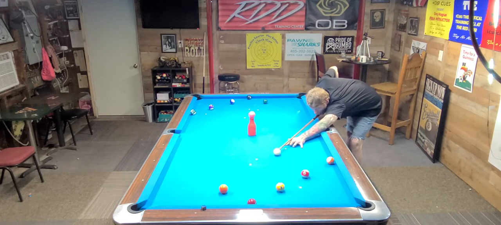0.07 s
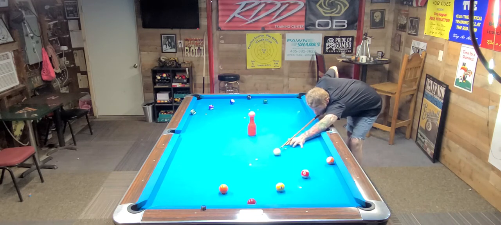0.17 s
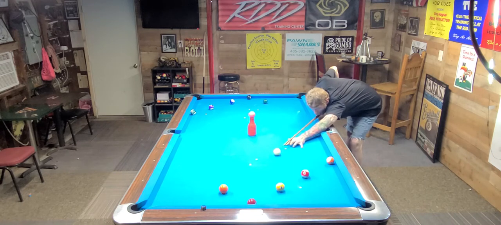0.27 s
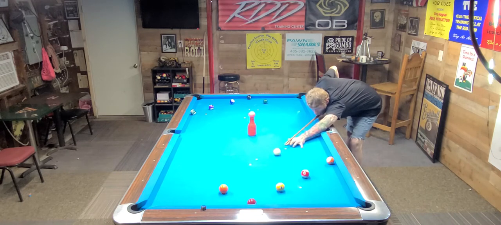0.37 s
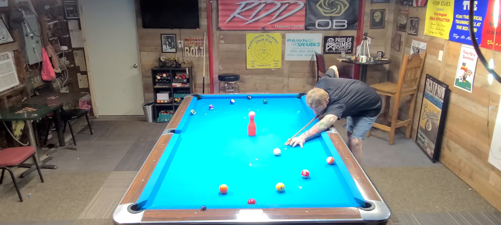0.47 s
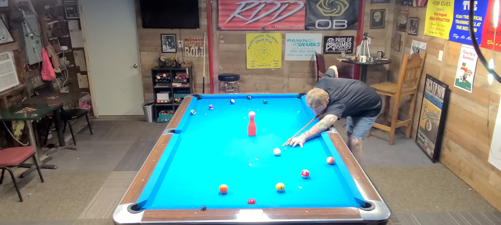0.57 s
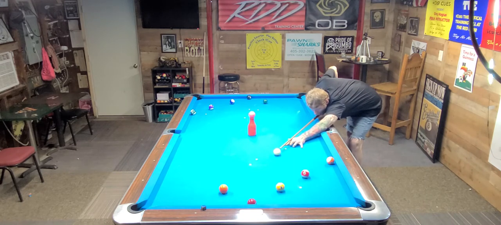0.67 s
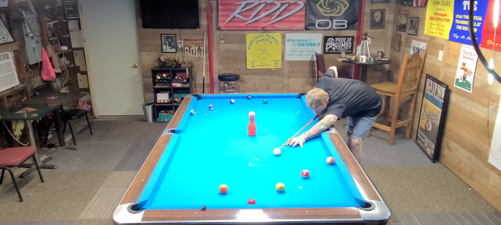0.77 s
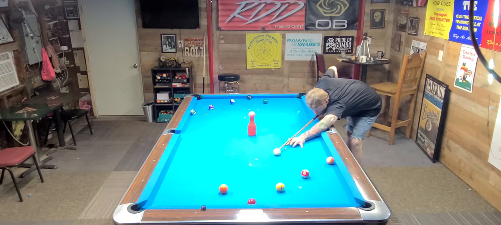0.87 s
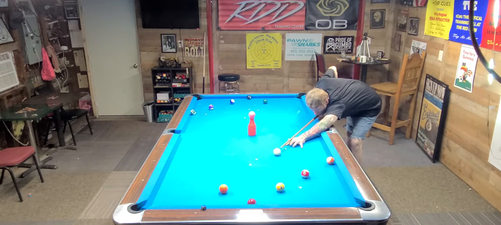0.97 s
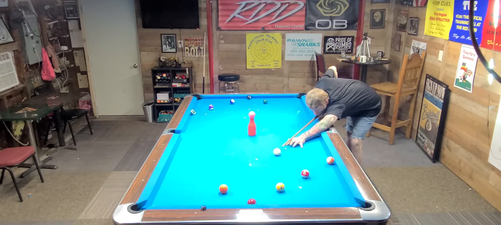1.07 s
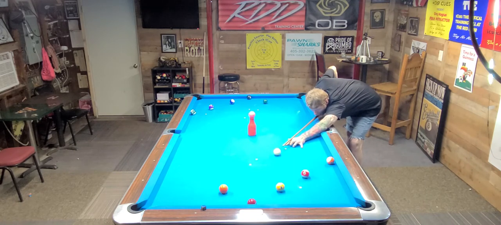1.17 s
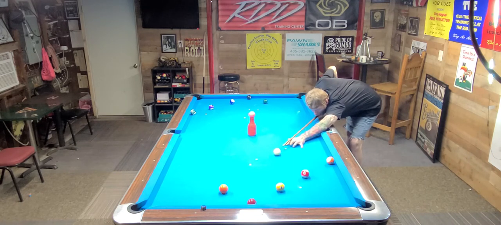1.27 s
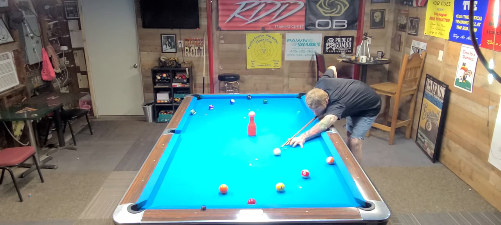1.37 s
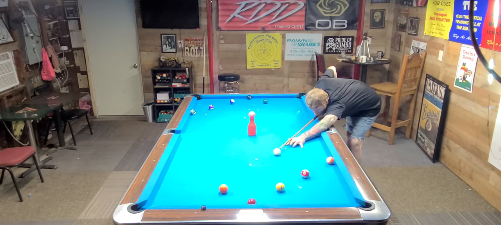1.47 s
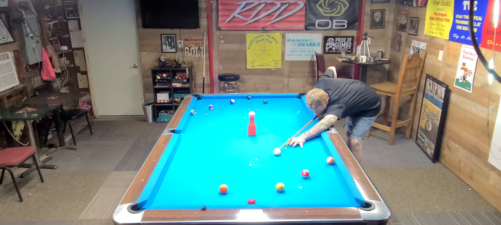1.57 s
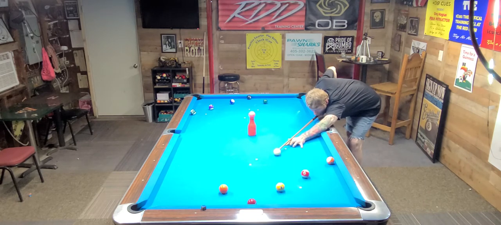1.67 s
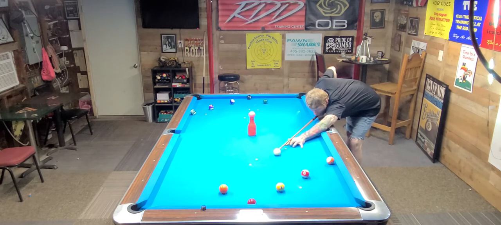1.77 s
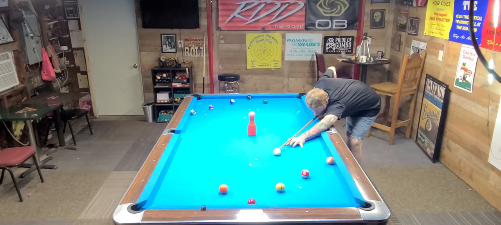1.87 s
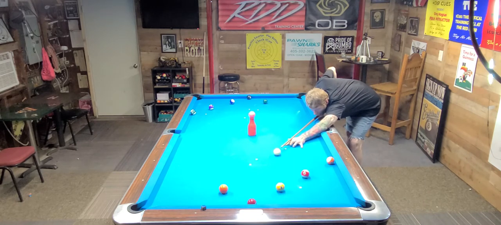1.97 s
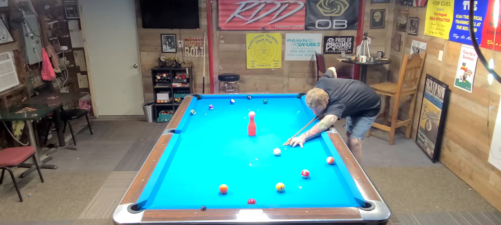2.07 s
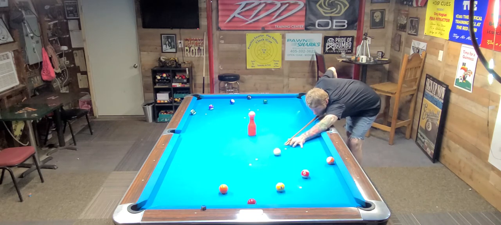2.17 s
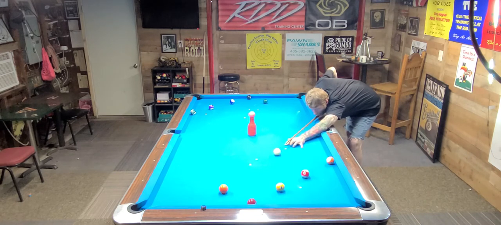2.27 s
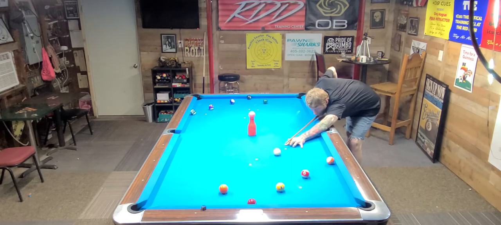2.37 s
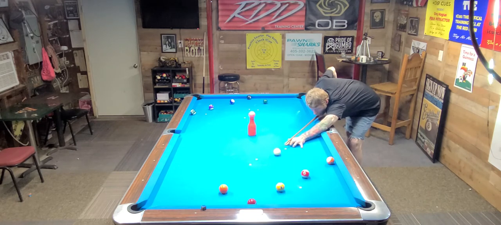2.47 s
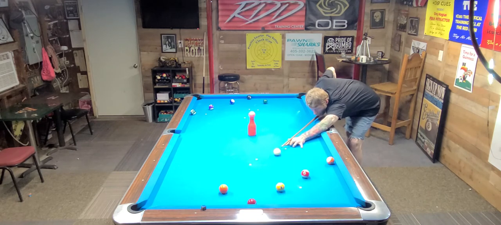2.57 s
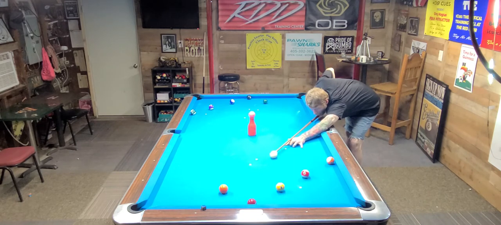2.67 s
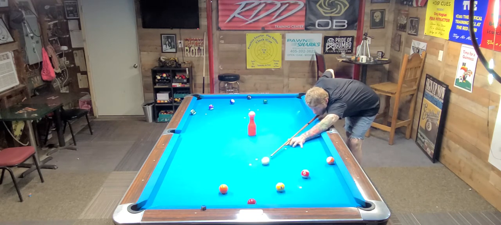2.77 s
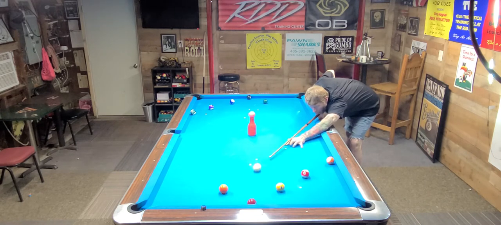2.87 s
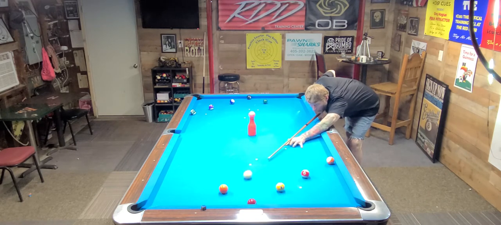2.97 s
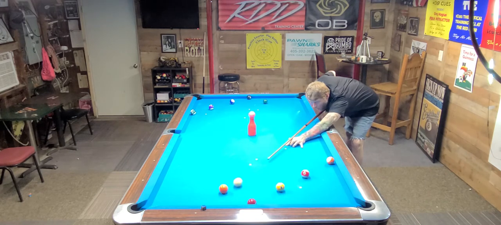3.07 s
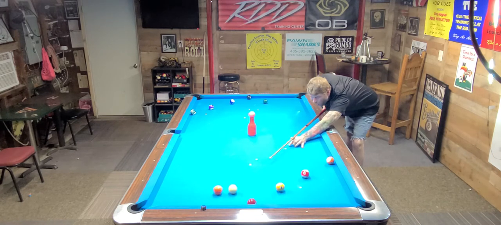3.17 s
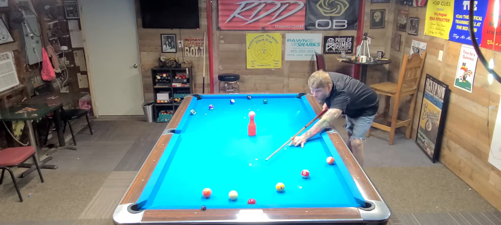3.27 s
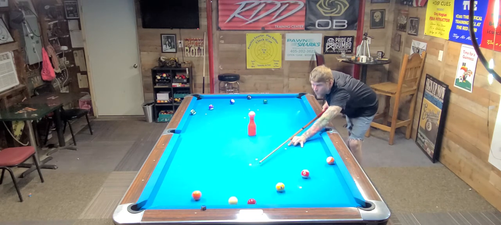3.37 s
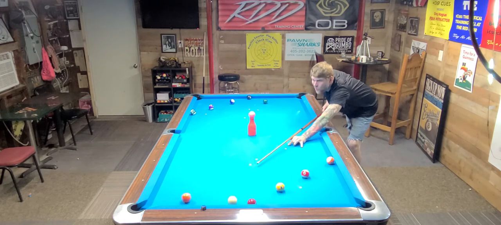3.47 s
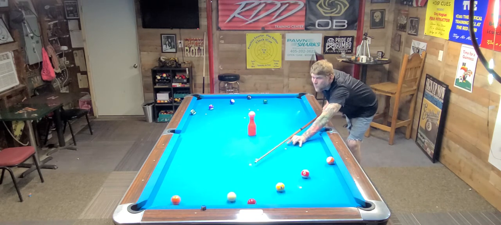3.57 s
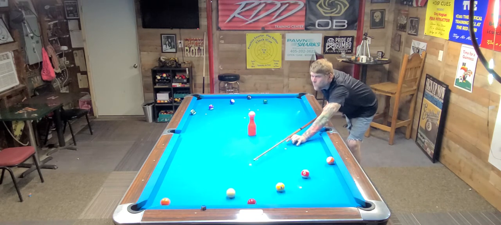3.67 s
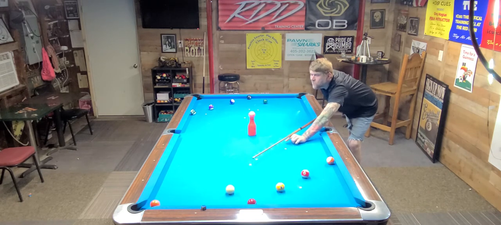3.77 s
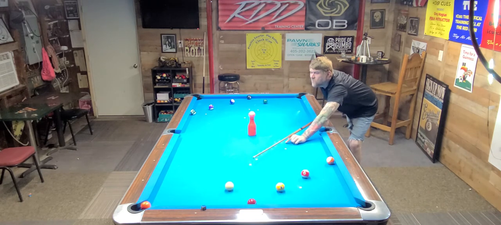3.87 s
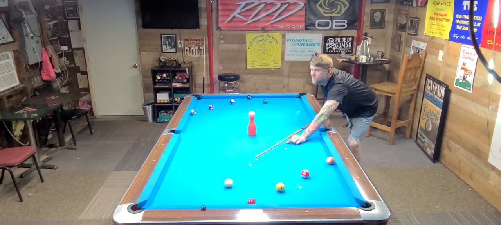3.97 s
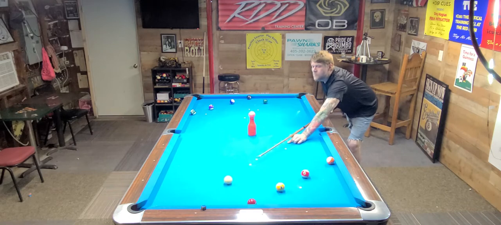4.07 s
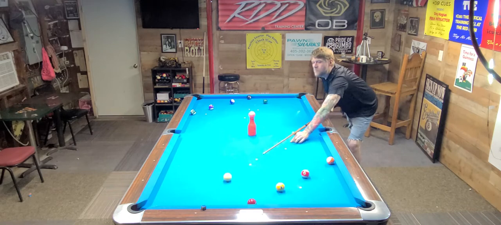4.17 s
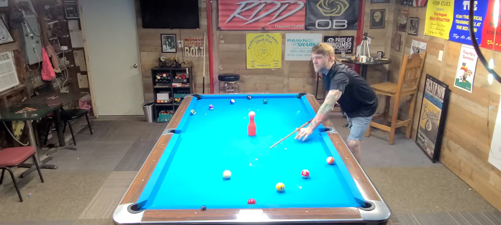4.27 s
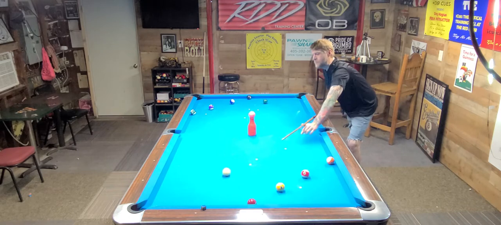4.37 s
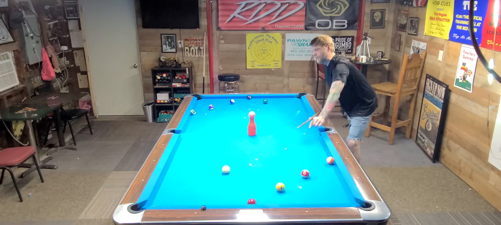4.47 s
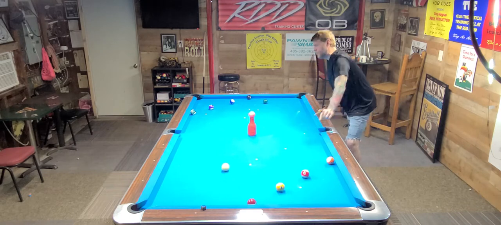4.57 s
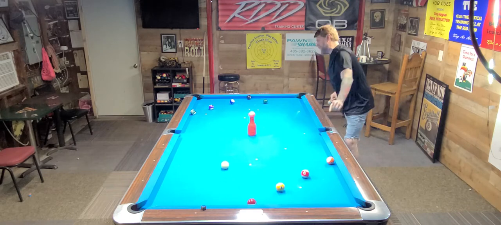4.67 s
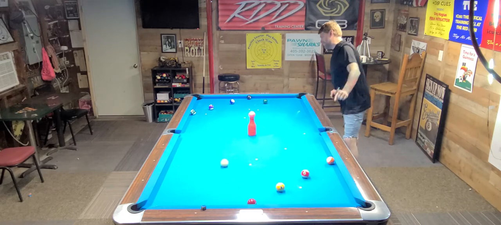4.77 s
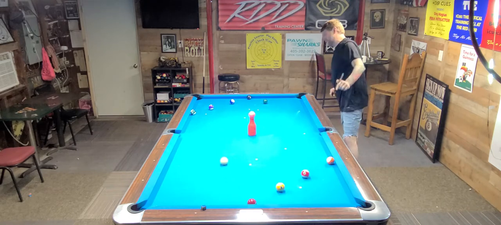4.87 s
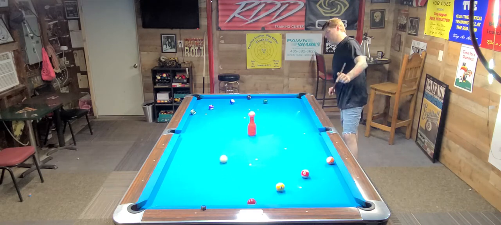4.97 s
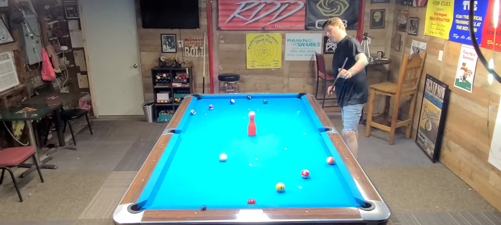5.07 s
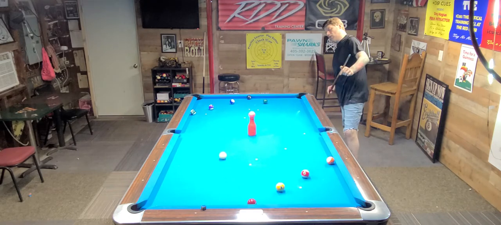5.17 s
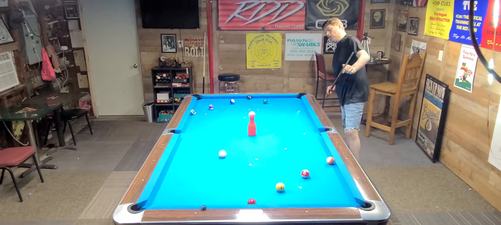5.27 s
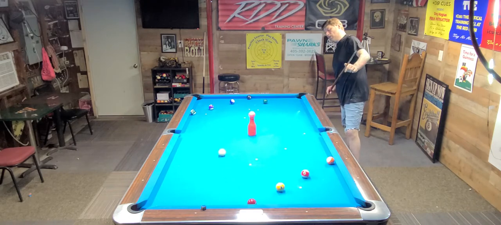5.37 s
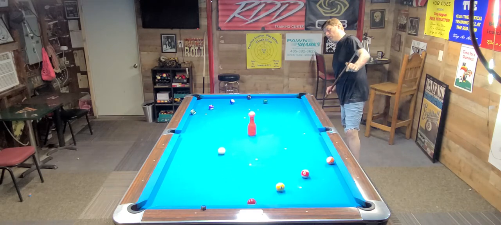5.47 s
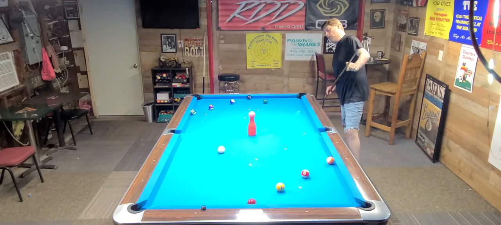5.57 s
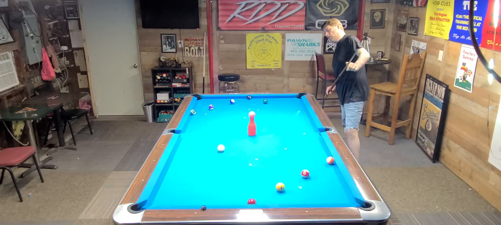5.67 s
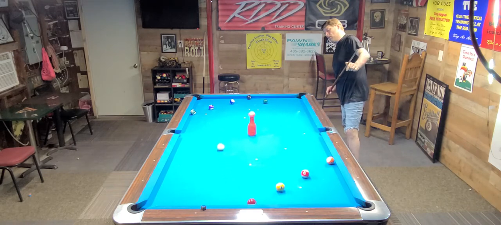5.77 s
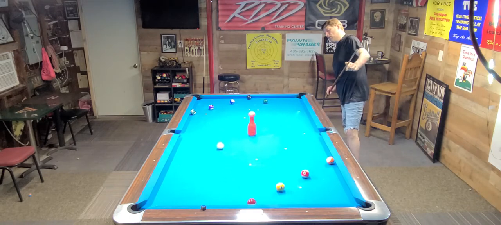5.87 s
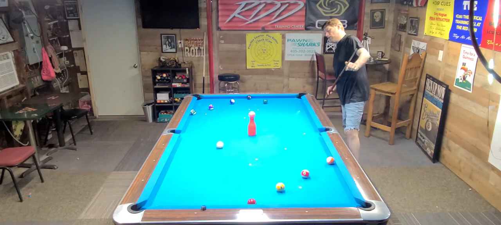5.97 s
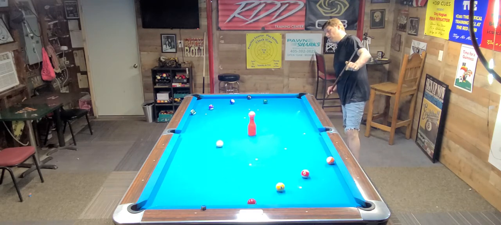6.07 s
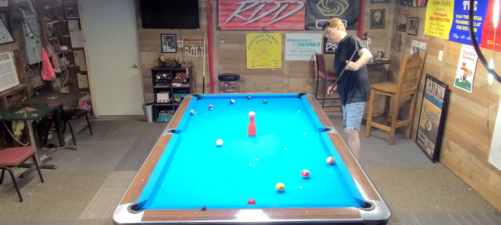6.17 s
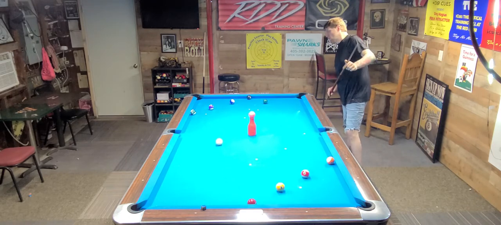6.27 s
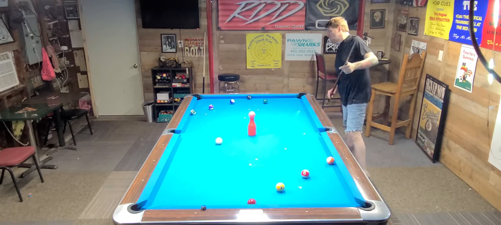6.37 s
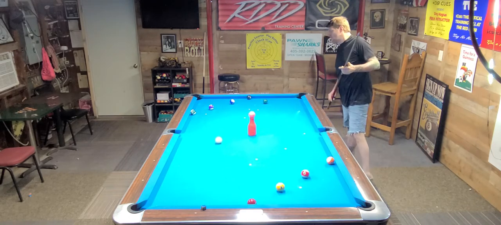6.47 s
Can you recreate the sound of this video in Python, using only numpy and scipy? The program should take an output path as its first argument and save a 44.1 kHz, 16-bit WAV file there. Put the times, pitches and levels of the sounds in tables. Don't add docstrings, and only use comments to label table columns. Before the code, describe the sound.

A small panelled room is quiet at first, with low ventilation rumble surging gently, faint duct tones coming and going and soft microphone hiss. At 2.7 s a leather cue tip strikes the cue ball: a modest, rounded knock with a faint woody shaft ring. At 3.2 s two hard resin balls meet in one loud, sharp clack, with a short room tail. Around 3.5 s very faint dull bumps touch the cushion. At 4.0 s a ball falls into a pocket with a loud double clack, then hollow wooden knocks and lighter jostling clicks tumble together until about 4.3 s. From 4.65 to 4.9 s the cue ball gives soft, low thuds on the rubber cushions. At about 5.0-5.35 s a hand rubs faintly along the lacquered shaft, grainy and airy. Rumble remains, and near 6.4-6.5 s two tiny rubs end with a slight squeak.

```python
import sys
import numpy as np
from scipy import signal
from scipy.fft import rfft, irfft, next_fast_len
from scipy.io import wavfile
from scipy.ndimage import uniform_filter1d, map_coordinates

SR = 44100
rng = np.random.default_rng(int(sys.argv[2]) if len(sys.argv) > 2 else 0)


def makeup_ratio(level_db):
    decades = np.asarray(level_db, float) / 20
    return 10 ** decades


def put_to_file(sound):
    columns = np.atleast_2d(sound).T
    safe = np.clip(columns, -1, 1)
    whole_steps = np.round(safe * 32767)
    wavfile.write(sys.argv[1], SR, whole_steps.astype(np.int16))


N = 286694
SIZE = next_fast_len(N + SR)
HZ = np.maximum(np.fft.rfftfreq(SIZE, 1 / SR), 1)


# [start_s, peak_db]
BALL_HIT = [
    (3.21, -10),
]
# [freq_hz, level_db]
BALL_COLOUR = [(180, -59), (300, -31.5), (479, -31.5), (585, -19), (773, -21), (1040, -10.5), (1710, -6),
               (1910, 1), (3370, -8), (4000, -30), (4300, -60), (5590, -80), (9460, -120)]
# [freq_hz, level_db]
BALL_SNAP = [(2650, -60), (4550, -50), (4800, -12), (5050, -4), (7020, -10.5), (8120, -4), (8830, -20.5),
             (9310, -33.5), (9500, -25.5), (10100, -7), (11700, -11.5), (13200, 1), (15700, -5.5)]
# [pitch_hz, level_db, t60_s]
SLATE_MODES = [(111.5, -3.5, .4), (186, 4, 0.71)]
# [delay_s, level_db, left_minus_right_db]
BALL_ECHOES = [(.0088, -17, -4), (.013, -12, 1), (.0142, -11, -1), (.0172, -12, 3), (.0185, -11, -3),
               (.0232, -14, 2), (.0335, -13, 2), (.0385, -13, -3), (.0452, -15, 2), (.0478, -14, -2),
               (.0498, -15, 3), (.0592, -14, -2), (.0605, -16, 2), (.0715, -15, 2), (.087, -17, -2),
               (.105, -19, 2), (.13, -21, -2)]


def balls():
    knock = -blow(BALL_HIT, BALL_COLOUR)
    clack = knock - makeup_ratio(-18.0) * blow(BALL_HIT, BALL_SNAP)
    bed = makeup_ratio(-43.5) * body(BALL_HIT, SLATE_MODES, ring=1.0)
    walls = 0
    for delay_s, level_db, side_db in BALL_ECHOES:
        sides = makeup_ratio(level_db + np.array([[.5], [-.5]]) * side_db)
        walls = walls + sides * np.roll(knock, round(delay_s * SR))
    return room(clack, wet_db=5.2, pan_db=-1.37, build_s=0.012, echo_db=-4.5, direct_hz=18970) + walls + bed


# [start_s, peak_db]
POCKET_CLACKS = [
    (4.0329, -10.5),
    (4.0395, -10),
    (4.0464, -20),
    (4.0604, -16),
    (4.08, -32.5),
]
# [freq_hz, level_db]
CLACK_COLOUR = [(530, -48.5), (900, 0.5), (1000, 9), (1160, 2), (1510, -7.5), (1800, 1.5), (2150, -5.5),
                (4500, -27.5), (5850, -53.5), (9900, -120)]
# [freq_hz, level_db]
CLACK_SNAP = [(2470, -39), (4200, 6), (5070, 0), (6940, -4), (7880, -8), (8940, -33.5), (9770, -14),
              (10700, -18), (14000, -4), (15700, -11.5)]
# [pitch_hz, level_db, t60_s]
CUP_MODES = [(1829.5, -1.5, 0.055), (1947, -4.5, 0.034), (2120.7, 2, 0.028)]
# [start_s, peak_db, into_frame_db]
WOOD_KNOCKS = [(4.035, -22.5, -58.5), (4.044, -14, -43), (4.054, -18.5, -44), (4.063, -25.5, -40.5),
               (4.089, -22, -42.5), (4.104, -20.5, -37.5), (4.143, -28, -40.5), (4.148, -16, -39.5),
               (4.158, -18, -35.5), (4.186, -17, -40), (4.197, -40.5, -33.5), (4.209, -20.5, -31.5),
               (4.237, -22, -37), (4.277, -31, -35)]
# [freq_hz, level_db]
KNOCK_COLOUR = [(150, -40.5), (260, -3.5), (311, -2.5), (510, 2.5), (762, -4.5), (1000, -8.5), (1200, -10),
                (2000, -19.5), (2600, -38), (4400, -120)]
# [pitch_hz, level_db, t60_s]
BOX_MODES = [(319.4, -5, .26), (408, -18, 0.23), (524, -5, 0.23), (568.4, -4.5, 0.23), (690.5, -7.5, 0.32),
             (818.1, -8, 0.16), (984, -6, 0.22), (1027.3, -5.5, 0.31)]
# [pitch_hz, level_db, t60_s]
FRAME_MODES = [(74.93, -10, 0.24), (105.7, -4, 0.2), (164.34, 0, 0.23), (237.6, 2.5, .18)]
BOX_LAG_S = .00042


def pocket():
    clack = -makeup_ratio(-6.5) * blow(POCKET_CLACKS, CLACK_COLOUR)
    clack = clack - makeup_ratio(-7.5) * body(POCKET_CLACKS, CUP_MODES, ring=.6)
    clack = above(clack + makeup_ratio(-22.5) * blow(POCKET_CLACKS, CLACK_SNAP), 500)
    knock = above(blow(WOOD_KNOCKS, KNOCK_COLOUR), 265) * makeup_ratio(-5.5)
    box = above(body(WOOD_KNOCKS, BOX_MODES, ring=0.49), 230)
    frame = makeup_ratio(-6.5) * above(body(WOOD_KNOCKS, FRAME_MODES, ring=.9, column=2), 50)
    wood = makeup_ratio(-12.5) * box + frame
    wood_right = frame + np.roll(wood - frame, round(BOX_LAG_S * SR))
    return (room(clack, wet_db=1.2, pan_db=-1.88, build_s=.005, echo_db=-5.5, direct_hz=5000)
            + room(knock + makeup_ratio(-12.0) * wood, wet_db=2.3, pan_db=0.0, build_s=.006, echo_db=-6.0)
            + np.array([wood, wood_right]))


# [start_s, peak_db]
RATTLE = [
    (4.1121, -25),
    (4.1273, -17.5),
    (4.1334, -13),
    (4.1497, -13),
    (4.1598, -16),
    (4.1757, -15),
    (4.1856, -21),
    (4.2125, -23),
    (4.245, -28),
]
# [freq_hz, level_db]
RATTLE_COLOUR = [(530, -40), (900, -2.5), (1100, 4.5), (1400, -3), (1700, -1.8), (2300, 0), (3200, -10),
                 (4300, -31), (5850, -54.5)]


def rattle():
    clack = -makeup_ratio(-5.5) * blow(RATTLE, RATTLE_COLOUR)
    clack = clack - makeup_ratio(-14) * body(RATTLE, CUP_MODES, ring=0.42)
    clack = clack + makeup_ratio(-23.5) * blow(RATTLE, CLACK_SNAP)
    return room(clack, wet_db=4, pan_db=-1.5, build_s=0.0057, echo_db=-4.5, direct_hz=3990)


# [start_s, peak_db, pitch_hz, t60_s]
RAIL_NOTES = [(3.493, -47.5, 333.4, 0.117), (3.528, -54, 408, 0.247), (3.544, -52, 227, 0.071),
              (3.572, -53, 397, 0.066), (4.655, -41, 445, 0.14), (4.676, -47, 690, 0.065),
              (4.688, -40, 300, .14), (4.673, -54, 940, .06), (4.675, -52, 800, .08), (4.66, -45, 230, .15),
              (4.657, -53, 720, .07), (4.74, -51, 350, .15), (4.68, -46, 180, .2), (4.785, -49, 400, .15),
              (4.865, -51, 390, .15), (4.83, -52, 200, .25), (4.705, -44, 245, .14),
              (4.725, -47.5, 509.5, 0.073), (4.778, -42.5, 467.8, 0.103), (4.815, -49, 273.8, 0.164),
              (4.848, -48.5, 450, 0.092), (4.905, -49.5, 234.2, 0.16)]
# [start_s, peak_db, pitch_hz, t60_s]
DRY_NOTES = [(4.0343, -16, 1900, 0.0375), (4.0398, -9, 2120, .022), (4.0465, -16.5, 560, .04),
             (4.0475, -19, 1250, 0.0354), (4.0545, -20, 580, 0.0346), (4.0575, -13, 1940, .04),
             (4.069, -23, 330, 0.0383), (4.091, -23, 480, 0.038), (4.1126, -26, 1900, 0.026),
             (4.1325, -19, 2130, 0.035), (4.158, -23, 2300, .03), (4.182, -24, 2300, .03),
             (4.064, -29, 1775, .08), (4.05, -23, 1290, .06), (4.15, -26, 1300, .07),
             (4.2, -28, 1170, .1), (2.85, -53, 2030, .3), (2.875, -58, 2630, .2), (2.79, -50, 3235, .15),
             (2.745, -44, 650, .15), (4.045, -20, 975, .1), (4.0455, -21, 2450, .04),
             (4.042, -27, 2900, .04), (4.05, -32, 3050, .03), (4.058, -28, 2750, .05),
             (4.09, -27, 330, .15), (4.222, -26, 900, .05), (4.24, -29, 2150, .06),
             (4.275, -33, 2150, .06), (4.18, -25, 1035, .15), (4.149, -22.5, 1800, .03),
             (4.174, -19, 1660, 0.05), (4.146, -21, 520, .07), (4.158, -19, 570, .05),
             (4.18, -25, 690, .1), (4.228, -27, 690, .1), (4.183, -19.5, 520, .06),
             (4.197, -22, 400, .04), (4.208, -23, 520, .08), (4.235, -26, 700, .04),
             (4.278, -30, 420, .04), (4.075, -26, 1900, .07), (2.7152, -31, 800, .015),
             (2.7185, -31, 1060, .04), (2.776, -36, 290, .07)]
PORT_LAG_S = .00009


def contacts():
    taps = notes(DRY_NOTES, rise_cycles=.6)
    high = above(taps, 1400)
    right = np.roll(high, round(PORT_LAG_S * SR)) + np.roll(taps - high, round(BOX_LAG_S * SR))
    sides = np.array([taps, right]) * makeup_ratio([[-.4], [.4]])
    return notes(RAIL_NOTES, rise_cycles=0.55) - sides


# [start_s, peak_db]
CUE_HIT = [
    (2.71, -29.5),
]
# [freq_hz, level_db]
PUSH_COLOUR = [(100, -22.5), (350, -11), (700, -1.5), (1100, -7.5), (1800, -31.5), (4000, -54)]
# [freq_hz, level_db]
CUE_COLOUR = [(53, -43.5), (90, -14), (186, 0.5), (380, -8.5), (648, -3), (1360, -10.5), (1430, -15),
              (2040, 0.5), (2140, -3), (3540, -3.5), (4300, -33), (5590, -61), (9460, -120)]
# [freq_hz, level_db]
TIP_COLOUR = [(2350, -27), (4000, -3), (4460, -10.5), (4750, -3), (5170, -7), (6690, -6.5), (8960, -22),
              (9710, -20.5), (14200, -16), (15700, -31)]
# [pitch_hz, level_db, t60_s]
SHAFT_MODES = [(188, -7, .45), (296, -14, .4), (649, -1, .2), (1028, -9, .32), (1270, -13, .27),
               (1486, -7, .33), (1733, -8, .17), (2040, 4, .33), (2022, -6, .33), (2340, -8, .2),
               (2650, -4, .24), (2634, -13, .4), (2960, -9, .33), (3230, -7, .3), (3600, -5.5, .24),
               (3973, -20, .23)]


def cue():
    push = makeup_ratio(6.5) * blow(CUE_HIT, PUSH_COLOUR)
    spread = blow(CUE_HIT, CUE_COLOUR) * makeup_ratio(4.3) + blow(CUE_HIT, TIP_COLOUR) * makeup_ratio(-8.5)
    shaft = body(CUE_HIT, SHAFT_MODES, ring=1.05)
    near = push + makeup_ratio(-3.5) * swell_after_cue(.009) * shaft
    far = room(spread + makeup_ratio(-32) * shaft, wet_db=10.5, pan_db=-0.06, build_s=0.0083, echo_db=2.5, direct_hz=610)
    return near * makeup_ratio([[-.6], [.6]]) + far


def swell_after_cue(build_s):
    since_s = np.maximum(np.arange(N) / SR - CUE_HIT[0][0], 0)
    return 1 - np.exp(-since_s / build_s)


# [start_s, peak_db]
THUDS = [(3.493, -45), (3.542, -53.5), (3.57, -64), (4.654, -41.5), (4.661, -34), (4.678, -40), (4.7, -45),
         (4.78, -46), (4.795, -51), (4.819, -47.5), (4.858, -45), (4.907, -54.5)]
# [freq_hz, level_db]
THUD_COLOUR = [(59, -45), (100, -10), (243, 2.5), (374, 0.5), (411, 4), (592, -9.5), (659, -7), (1960, -24),
               (2500, -39), (3250, -67.5), (5500, -120)]
# [pitch_hz, level_db, t60_s]
RAIL_MODES = [(242, -11, 0.104), (332, -11.5, 0.059), (480, 3.5, 0.029), (710, 3.5, 0.041),
              (945, -7.5, 0.043)]


def cushions():
    rail = makeup_ratio(-16) * body(THUDS, RAIL_MODES, ring=0.34)
    push = makeup_ratio(-8.5) * blow(THUDS, THUD_COLOUR)
    return rail + room(push, wet_db=7.5, pan_db=-0.5, build_s=0.0064, echo_db=-3.0)


# [pitch_hz, level_db, t60_s]
FLOOR_MODES = [(54.4, -3, 0.46), (100.16, -2, 0.42), (110, 0, 0.363)]


def floor_shake():
    return makeup_ratio(-13.5) * body(CUE_HIT, FLOOR_MODES, ring=1.35) * swell_after_cue(0.053)


# [full_speed_s, time_to_gain_20db_s, hold_s, level_db]
STROKES = [
    (5.052, 0.0913, 0.228, -55),
    (6.43, 0.02, .004, -70.5),
    (6.482, 0.0208, 0.0039, -61.5),
]
# [freq_hz, level_db]
SLIDE_COLOUR = [(470, -11.5), (800, -8.5), (952, -10), (1350, -4.5), (1690, -6.5), (1890, -4), (2780, -5),
                (4460, -6.5), (5050, -11), (6990, -9.5), (8960, -35.5), (10200, -28), (15700, -30.5)]
# [freq_hz, left_minus_right_db]
SLIDE_TILT = [(60, 0.0), (110, -1.0), (200, -1.0), (380, 0.0), (700, -1.0), (1290, -1.5), (2380, -3.5),
              (4400, -3.5), (8120, 0.0), (15000, -8.0)]
# [pitch_hz, width_hz, level_db]
SQUEAK_MODES = [(1727, 32, 4.5), (2050, 19, -5.5), (2607, 42, -10), (2945, 21, -5.5), (4160, 110, -8)]
RUB_SAG_DB_PER_S, SWISH_SAG_DB_PER_S = 9.5, 26


def slide():
    colour = makeup_ratio(at_hz(SLIDE_COLOUR, HZ) + np.outer([.5, -.5], at_hz(SLIDE_TILT, HZ)))
    dull = 1 / (1 + (HZ / 3500) ** 6)
    rub = strokes(STROKES, RUB_SAG_DB_PER_S) * makeup_ratio(1.47 * drift(150)) * noise(colour * dull)
    swish_gain = makeup_ratio(0.64 + 0.71 * drift(120))
    swish = strokes(STROKES, SWISH_SAG_DB_PER_S) * swish_gain * noise(colour * (1 - dull))
    squeak = makeup_ratio(7) * strokes(STROKES[-1:], 0) * noise(humps(SQUEAK_MODES))
    return rub + swish + squeak


def strokes(rows, sag_db_per_s):
    t, out = np.arange(N) / SR, 0
    release_ratio = 2.03
    for start_s, rise_s, hold_s, level_db in rows:
        before = np.maximum(start_s - t, 0)
        held = np.clip(t - start_s, 0, hold_s)
        after = np.maximum(t - start_s - hold_s, 0)
        out = out + makeup_ratio(level_db - sag_db_per_s * held - 20 * (before + after / release_ratio) / rise_s)
    return out


# [centre_s, half_length_s, level_db]
GRIPS = [
    (5.09, 0.105, -55.5),
    (5.239, 0.124, -61),
]
# [pitch_hz, width_hz, level_db]
GRIP_MODES = [
    [(1350, 80, -4), (1930, 220, 1), (2400, 60, -0.5), (3550, 70, -2.5), (4040, 60, -5), (4600, 155, 0.5),
     (6190, 200, -7)],
    [(1330, 77, -1), (1865, 110, -3.5), (2620, 60, -5.5), (2930, 84, -2), (3220, 80, -1.5), (5950, 200, -8)],
]


def grip():
    out = 0
    for row, modes in zip(GRIPS, GRIP_MODES):
        out = out + swells([row]) * makeup_ratio(1.66 * drift(60)) * noise(humps(modes))
    return out


# [pitch_hz, width_hz, level_db]
RUMBLE_MODES = [(53.3, 6.4, -3), (67.07, 4.4, -2)]
# [pitch_hz, width_hz, level_db]
NEXT_MODES = [(106.3, 9.4, -2), (115.5, 6, -2)]
REST_DB = [-61, -60.5, -67]
# [centre_s, half_length_s, level_db]
SURGES = [
    [(.1, 0.192, -52.5), (1.1, 0.14, -58.5), (1.6, 0.089, -56), (2.3, 0.085, -57.5), (2.85, 0.128, -51.5),
     (3.68, 0.06, -53.5), (4.45, 0.17, -50), (4.96, 0.092, -55), (5.45, 0.162, -59)],
    [(.27, 0.098, -59.5), (.87, 0.148, -58.5), (1.92, 0.109, -54), (2.5, 0.052, -56.5), (3.06, 0.174, -49),
     (3.55, 0.206, -60), (4.25, 0.12, -53.5), (4.8, 0.147, -48.5), (5.55, 0.454, -54), (6.22, 0.34, -51.5)],
    [(.27, 0.079, -65), (1.1, 0.685, -62), (2.45, 0.257, -61.5), (3.25, 0.208, -59.5), (3.75, 0.3, -62.5),
     (4.35, 0.11, -54), (4.6, 0.105, -60.5), (5.08, 0.357, -59), (5.6, 0.22, -68), (6.38, 0.16, -62)],
]
# [freq_hz, level_db]
AIR_COLOUR = [(12, -46), (20, -10), (59, 4), (86, -4), (117, -11.5), (141, -14), (329, -20.5), (409, -19.5),
              (439, -17), (472, -21), (702, -22.5), (755, -25), (1500, -35), (1950, -67.5), (3300, -120)]
VENT_LAG_S = .00027


def ventilation():
    rumble = 0
    for rest_db, rows, modes in zip(REST_DB, SURGES, [RUMBLE_MODES[:1], RUMBLE_MODES[1:], NEXT_MODES]):
        gain = makeup_ratio(rest_db) + makeup_ratio(-3.5) * swells(rows)
        rumble = rumble + gain * swelling(modes, even_s=.14)
    gap = 1 - 0.7865 / (1 + ((HZ - 70) / 45) ** 4)
    air = noise(gap * makeup_ratio(at_hz(AIR_COLOUR, HZ)), VENT_LAG_S)
    return rumble + makeup_ratio(-60 + .8 * drift(3.4)) * air


# [pitch_hz, width_hz]
DUCT_TONES = [(338, 9.3), (439, 6.2), (706, 11)]
# [centre_s, half_length_s, level_db]
WHISTLES = [
    [(.87, 0.25, -67.5), (1.25, 0.154, -73), (2.95, 0.24, -70), (5.14, 0.123, -70), (5.68, 0.26, -68.5)],
    [(1.25, 0.344, -74.5), (1.58, 0.24, -68.5), (2.15, 0.1075, -63.5), (2.55, 0.13, -65.5),
     (3.88, .15, -68), (5.1, 0.18, -72.5), (5.5, 0.133, -74)],
    [(.75, 0.138, -73), (1.05, 0.172, -72), (1.62, 0.21, -71.5), (2.17, 0.124, -74), (3.33, 0.128, -66.5),
     (5.14, 0.15, -75)],
]


def duct():
    rest_db, out = -82.5, 0
    for rows, (pitch_hz, width_hz) in zip(WHISTLES, DUCT_TONES):
        tone = swelling([(pitch_hz, width_hz, 0)], even_s=0.1)
        out = out + (makeup_ratio(rest_db) + swells(rows)) * tone
    return out


# [freq_hz, level_db]
HISS_COLOUR = [(710, -29), (1200, 0.5), (1310, -8), (1610, -6), (2060, -5), (2840, -3), (3420, -9.5),
               (4100, -9), (5150, -12), (6520, -3.5), (7040, -11), (7920, -31), (8540, -35.5), (11900, -22),
               (15800, -24)]
# [freq_hz, left_minus_right_db]
HISS_TILT = [(60, -1.0), (110, -1.5), (200, -0.5), (380, -0.5), (700, 0.0), (1290, 4.0), (2380, 5.5),
             (4400, 4.0), (8120, 9.5), (15000, -1.0)]
# [centre_s, half_length_s, added_db]
HISS_LIFTS = [
    (3.3, 0.41, -86),
    (4.12, 0.209, -77.5),
    (4.5, 0.72, -87),
    (6.5, 0.33, -79),
]


def hiss():
    colour = makeup_ratio(at_hz(HISS_COLOUR, HZ) + np.outer([.5, -.5], at_hz(HISS_TILT, HZ)))
    level = makeup_ratio(-74.5) + swells(HISS_LIFTS)
    return makeup_ratio(7.5 + 0.44 * drift(3.786)) * level * noise(colour, VENT_LAG_S)


# [delay_s, level_db, left_minus_right_db]
ECHOES = [(.0045, -3, 3.5), (.009, -7.5, -4.5), (0.0114, -5.5, 1.5), (0.014, -2.5, -1), (.019, -10, 5),
          (0.0271, -13.5, 1)]


def room(x, wet_db, pan_db, build_s, echo_db, direct_hz=15000, high_pan_db=-5.0):
    answer = np.zeros((2, SIZE))
    answer[:, 0] = 1
    for delay_s, level_db, side_db in ECHOES:
        answer[:, round(delay_s * SR)] += makeup_ratio(level_db + echo_db + np.array([.5, -.5]) * side_db)
    answer[:, :SR] = signal.lfilter(*signal.butter(2, min(direct_hz, 20000), fs=SR), answer[:, :SR])
    answer[:, :SR] += makeup_ratio(wet_db) * reflections(build_s)
    answer[:, -900:] = makeup_ratio(-44.5 + np.linspace(-22, 0, 900)) * rng.standard_normal((2, 900))
    shade_db = pan_db / 2 + high_pan_db / (1 + (8000 / HZ) ** 4)
    shade = makeup_ratio(np.outer([1, -1], shade_db))
    return irfft(rfft(x, SIZE) * rfft(answer) * shade, SIZE)[:, :N]


# [freq_hz, t60_s]
ROOM_T60 = [(100, 0.716), (300, 0.45), (1000, 0.413), (2500, 0.36), (6000, 0.31), (12000, 0.15)]
# [freq_hz, side_minus_mid_db]
ROOM_WIDTH = [(60, -21), (110, -17.5), (200, -16), (380, -6.5), (700, -2.5), (1290, 1), (2380, 1),
              (4400, 1), (8120, 0), (15000, -1.5)]
LATE_DB, LATE_RATIO = -30, 1.8


def reflections(build_s):
    t, hz = np.arange(SR) / SR, np.arange(SR // 2 + 1) + .5
    mid, side = rfft(rng.standard_normal((2, SR)))
    waves = mid + makeup_ratio(at_hz(ROOM_WIDTH, hz)) * side * [[1], [-1]]
    tail, edges_hz = 0, 40 * 2 ** np.arange(0, 9.1, .5)
    for low, high in zip(edges_hz, edges_hz[1:]):
        band = irfft(waves * ((hz >= low) & (hz < high)), SR)
        band = band / uniform_filter1d(band ** 2, 180) ** .22
        band = band * np.sqrt((high - low) / np.mean(band ** 2))
        fall_db = -60 * t / at_hz(ROOM_T60, np.sqrt(low * high))
        tail = tail + band * (makeup_ratio(fall_db) + makeup_ratio(LATE_DB + fall_db / LATE_RATIO))
    lumps = makeup_ratio(1.1 * np.interp(t * 400, np.arange(401), rng.standard_normal(401)))
    tail = tail * lumps * (1 - np.exp(-t / build_s))
    return tail / np.sqrt((tail ** 2).sum(1).mean())


def blow(events, colour):
    return signal.oaconvolve(clicks(events), pulse(colour))[:N]


def clicks(events, spread_db=0, column=1):
    contact_s = .0008
    rows, out = np.array(events), np.zeros(N)
    at = np.round((rows[:, 0] + contact_s) * SR).astype(int)
    out[at] = makeup_ratio(rows[:, column] + spread_db * rng.standard_normal(len(rows)))
    return out


def pulse(colour, size=16384):
    hz = np.maximum(np.fft.rfftfreq(size, 1 / SR), 1)
    cepstrum = irfft(np.log(makeup_ratio(np.maximum(at_hz(colour, hz), -70))), size)
    cepstrum[1:size // 2] *= 2
    cepstrum[size // 2 + 1:] = 0
    shape = irfft(np.exp(rfft(cepstrum)), size)[:SR // 10]
    return shape / np.abs(shape).max()


def body(events, modes, ring, column=1):
    out = np.zeros(N)
    for pitch_hz, level_db, t60_s in modes:
        r = makeup_ratio(-60 / (ring * min(t60_s, .45) * SR))
        w = 2 * np.pi * pitch_hz / SR
        strikes = clicks(events, 1.2, column) + 1e-18
        out += signal.lfilter([0, makeup_ratio(level_db) * np.sin(w)], [1, -2 * r * np.cos(w), r * r], strikes)
    top_hz = 1.4 * max(pitch_hz for pitch_hz, _, _ in modes)
    return signal.sosfilt(signal.butter(6, top_hz, fs=SR, output="sos"), out)


def notes(rows, rise_cycles):
    out = np.zeros(N)
    for start_s, peak_db, pitch_hz, t60_s in rows:
        at = int(start_s * SR) + np.arange(1, SR // 4)
        t = at / SR - start_s
        rise = 1 - np.exp(-t * pitch_hz / rise_cycles)
        out[at] += makeup_ratio(peak_db - 60 * t / t60_s) * rise * np.sin(2 * np.pi * pitch_hz * t)
    return out


def above(x, cut_hz):
    return signal.sosfilt(signal.butter(3, cut_hz, "high", fs=SR, output="sos"), x)


# [freq_hz, side_minus_mid_db]
AIR_WIDTH = [(60, -21), (110, -18.5), (200, -13.5), (380, -19.5), (700, -6.5), (1290, 2), (2380, -3.5),
             (4400, -0.5), (8120, -4), (15000, 3)]


def noise(gain, lag_s=0):
    mid, side = rfft(rng.standard_normal((2, SIZE)))
    both = mid + makeup_ratio(at_hz(AIR_WIDTH, HZ)) * side * [[1], [-1]]
    both[1] *= np.exp(-2j * np.pi * HZ * lag_s)
    x = irfft(gain * both, SIZE)[:, :N]
    return x / np.sqrt(np.mean(x ** 2) + 1e-20)


def humps(modes):
    return sum(makeup_ratio(level_db) / (1 + (2 * (HZ - pitch_hz) / width_hz) ** 2) for pitch_hz, width_hz, level_db in modes)


def swelling(modes, even_s):
    x = noise(humps(modes), VENT_LAG_S)
    return x / np.sqrt(uniform_filter1d(np.mean(x ** 2, 0), int(even_s * SR)) + 0.064)


def swells(rows):
    t, gain = np.arange(0, N / SR + .01, .005), 0
    for centre_s, half_s, level_db in rows:
        phase = np.clip((t - centre_s) / half_s, -1, 1)
        gain = gain + makeup_ratio(level_db) * np.cos(np.pi / 2 * phase) ** 2
    return np.interp(np.arange(N) / SR, t, gain)


def drift(rate_hz):
    knots = rng.standard_normal(int(N / SR * rate_hz) + 3)
    at = np.arange(0, N + 32, 32)
    return np.interp(np.arange(N), at, map_coordinates(knots, [at / SR * rate_hz], order=3))


def at_hz(points, hz):
    table_hz, value = np.array(points).T
    return np.interp(np.log(hz), np.log(table_hz), value)


def scene():
    pool = balls() + pocket() + rattle() + contacts() + cue() + cushions() + floor_shake()
    hand = slide() + grip()
    return pool + hand + ventilation() + duct() + hiss()


def low_pass(x):
    return signal.sosfilt(signal.butter(12, 16370, fs=SR, output="sos"), x)


def record(dry):
    cutoff_hz = 15760
    top_db = -24 * (HZ > cutoff_hz) - 60 * (HZ > cutoff_hz + 610)
    mix = irfft(rfft(dry, SIZE) * makeup_ratio(top_db), SIZE)[:, :N]
    return low_pass(mix)


dry = scene()
out = record(dry)
put_to_file(out)
```